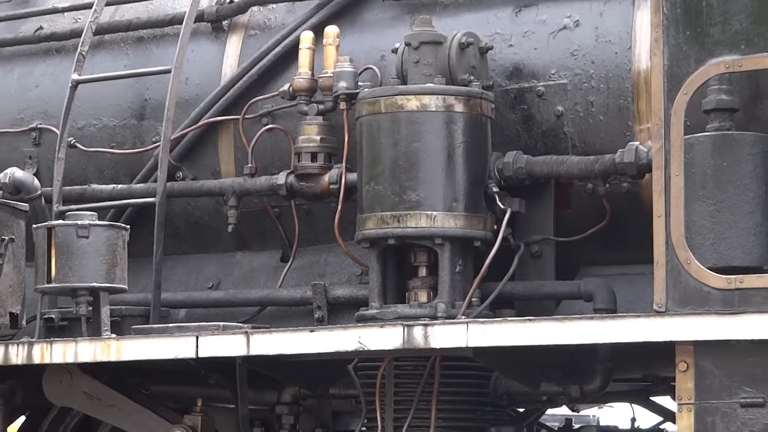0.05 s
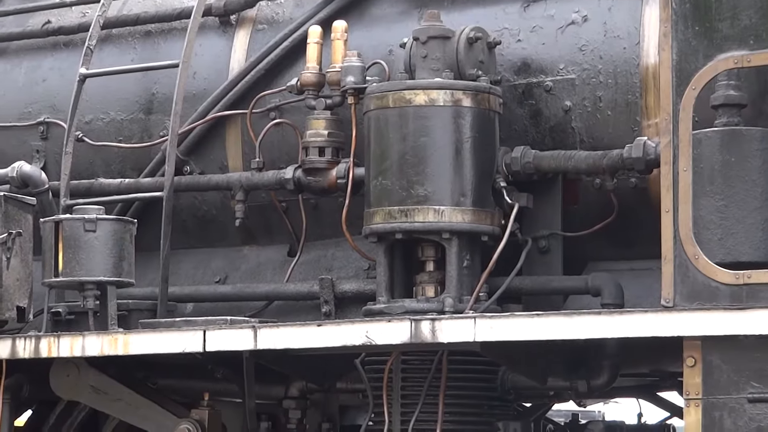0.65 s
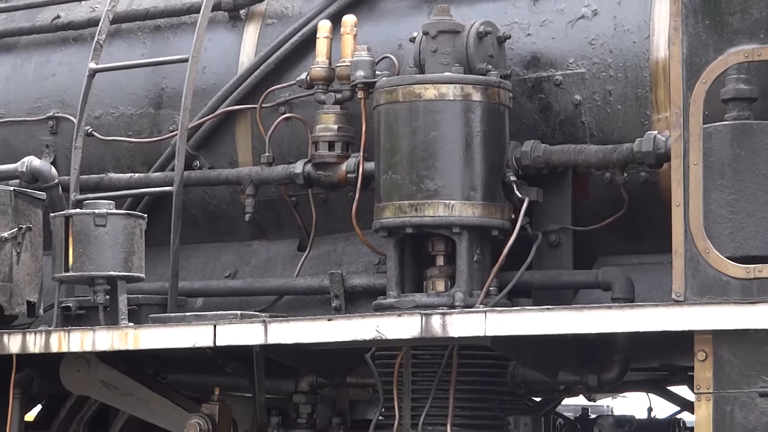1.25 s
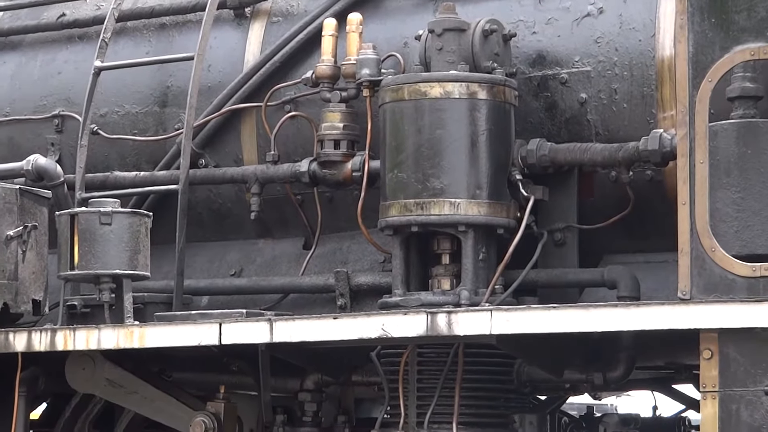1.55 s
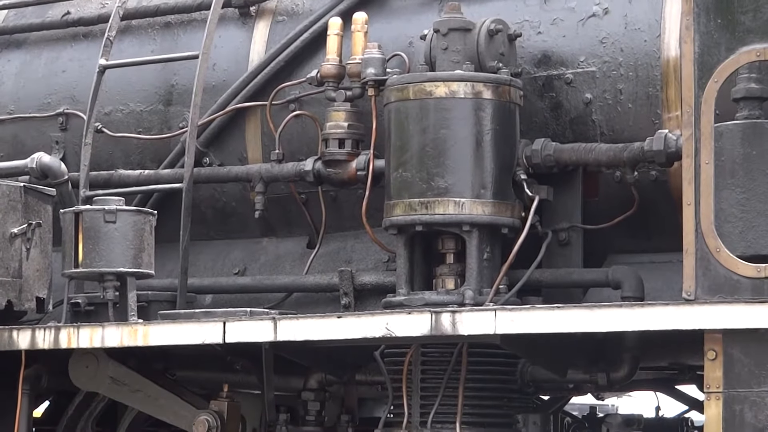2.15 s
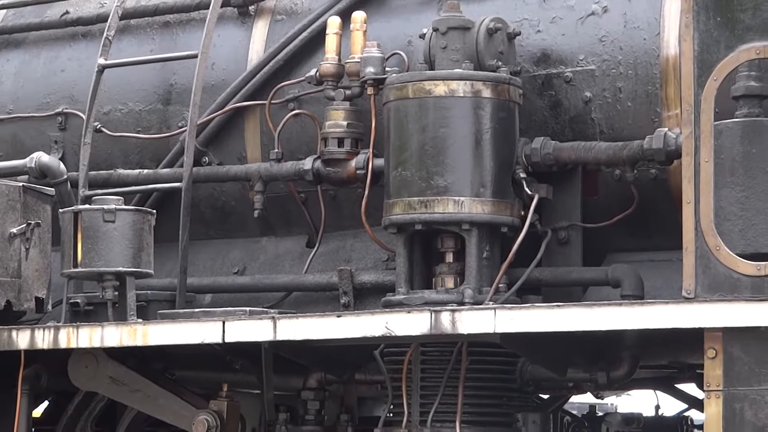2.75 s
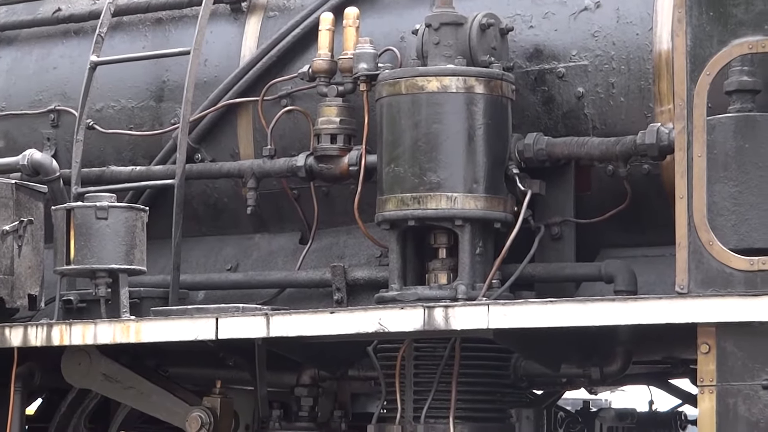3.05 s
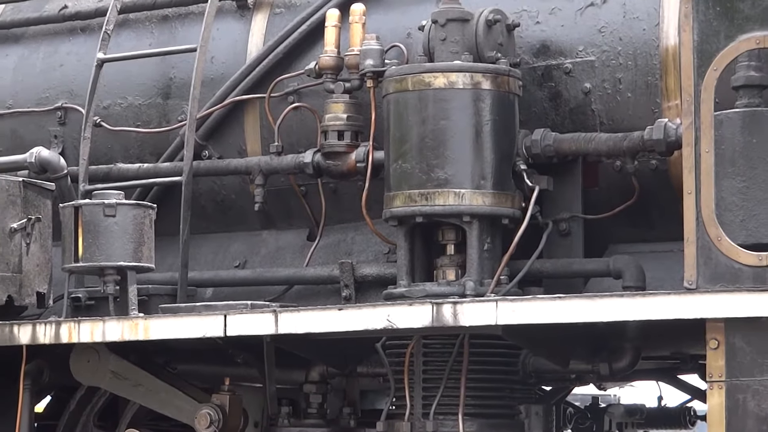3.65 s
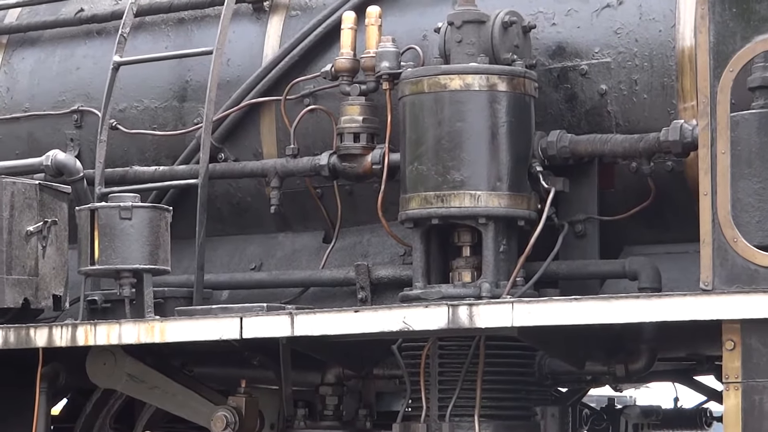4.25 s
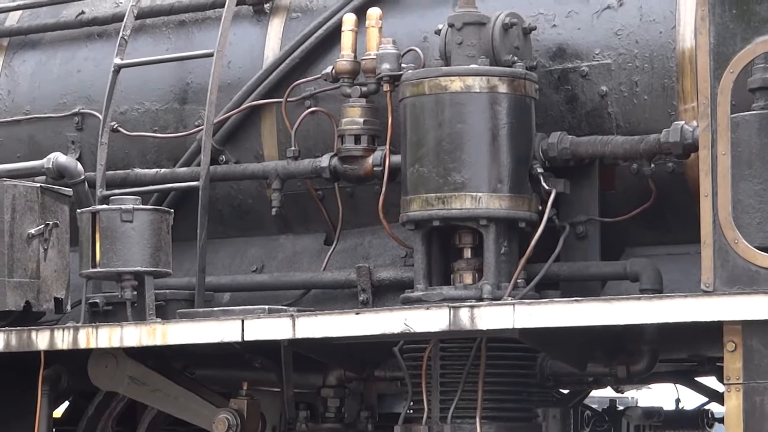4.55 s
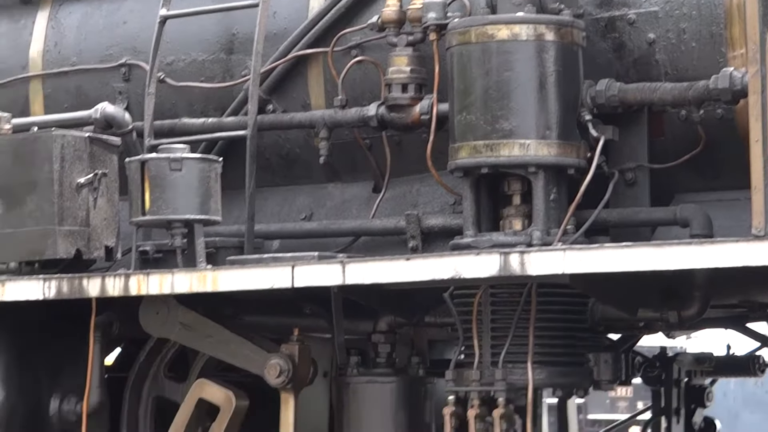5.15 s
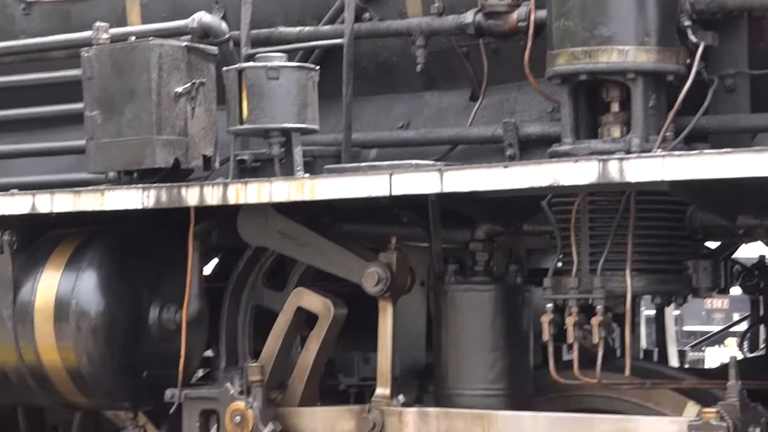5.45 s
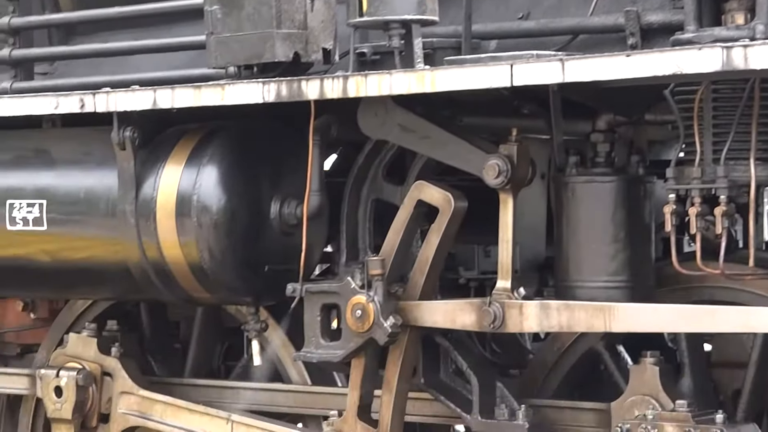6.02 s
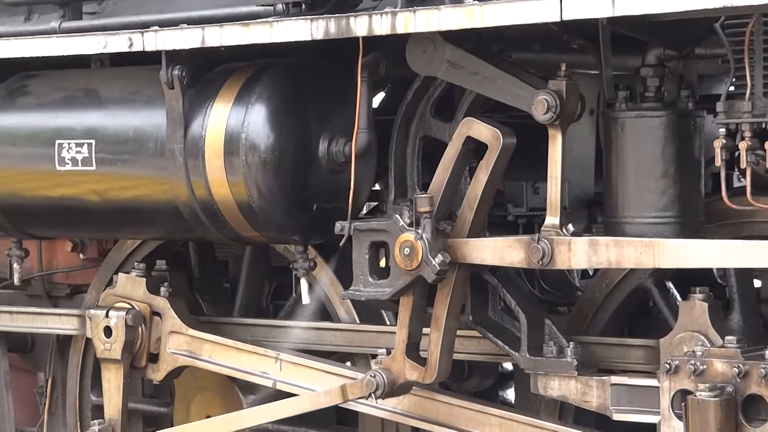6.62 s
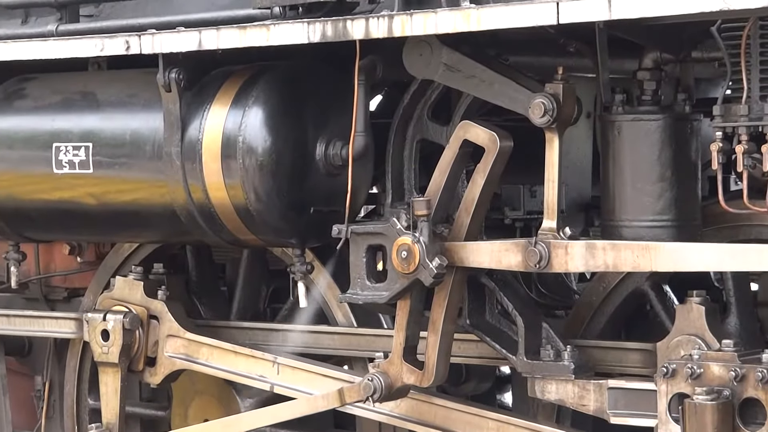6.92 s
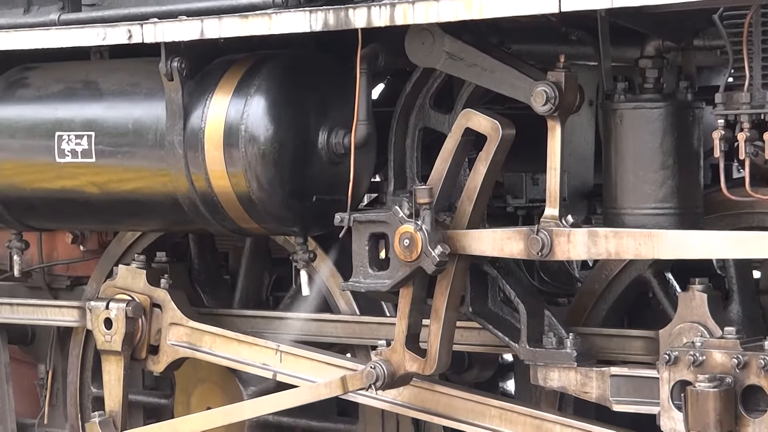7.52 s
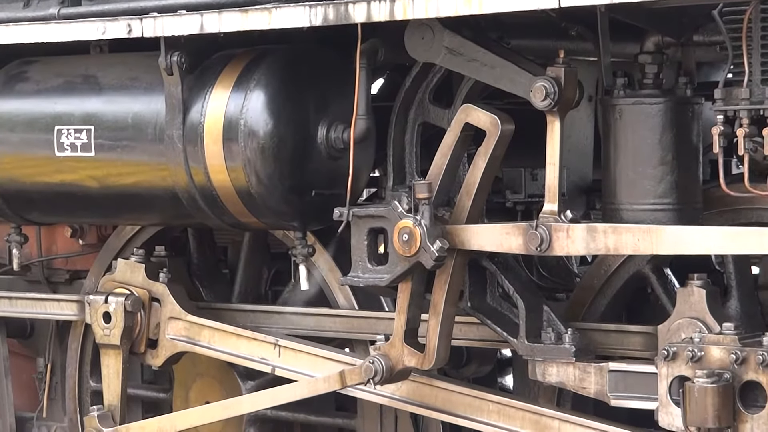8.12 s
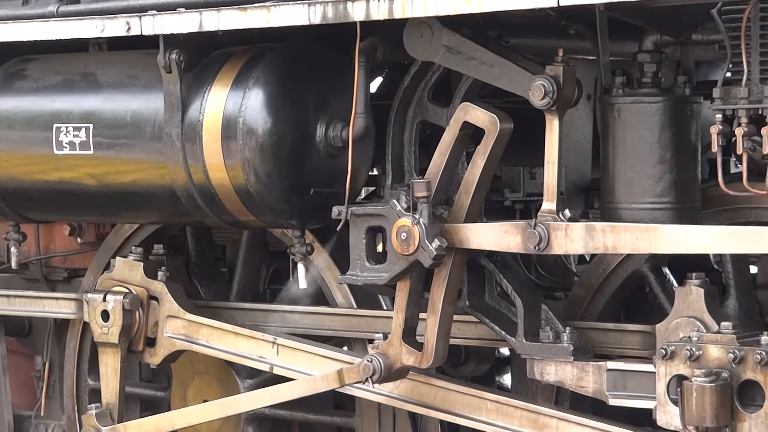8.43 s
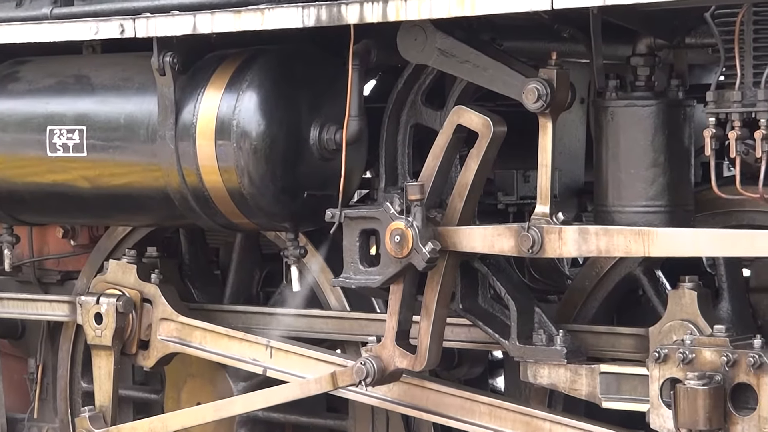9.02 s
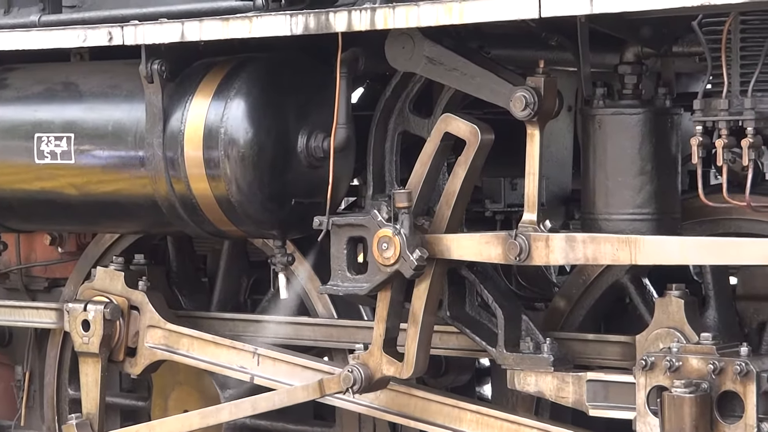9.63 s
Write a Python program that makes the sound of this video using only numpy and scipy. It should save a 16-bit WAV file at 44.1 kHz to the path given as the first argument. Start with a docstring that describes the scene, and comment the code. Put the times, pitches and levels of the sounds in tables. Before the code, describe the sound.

From the start, the air pump of a standing steam locomotive chuffs outdoors at about three strokes a second, slowing almost imperceptibly over ten seconds. Each stroke is a bright, hissing blast of steam that opens with a sharp spit and tiny high chirps, then sags into a thin, fitful, slightly falling whistle. Every other stroke begins with a dull, dry knock from the piston. Underneath, a hollow murmur swells in the pipes with each stroke and a soft leak simmers steadily. Faint, short, hollow hoots surface in the murmur near 1, 1.6, 3.6 and 4.3 seconds. Between about 4.5 and 7 seconds the microphone tips toward the wheels and the knocks soften, while the hissing stays just as strong. The whistle and murmur weaken around 7 seconds and recover by about 8.5. The pumping continues to the end.

```python
"""Steam locomotive air pump

The pump of a standing engine works up and down outdoors, three strokes a second, slowly lengthening.
Each stroke lets out a blast of steam that spits, chirps, then sags and whistles as the piston slows.
The pump knocks at one end of its travel; the pipes murmur and a leak simmers underneath.
Halfway through, the microphone tips down toward the wheels and the knocks soften."""
import sys
import numpy as np
from scipy import signal
from scipy.fft import rfft, irfft, next_fast_len
from scipy.io import wavfile
from scipy.ndimage import uniform_filter1d

SR = 44100
rng = np.random.default_rng(int(sys.argv[2]) if len(sys.argv) > 2 else 0)


def file_out(sig):
    """Save sig as 16-bit WAV at sys.argv[1]."""
    # one column per channel
    cols = np.atleast_2d(sig).T
    # limit, then scale
    lim = np.clip(cols, -1, 1)
    pcm = np.round(lim * 32767).astype(np.int16)
    wavfile.write(sys.argv[1], SR, pcm)


N = 431298
TIME = np.arange(N) / SR
FREQS = np.fft.rfftfreq(N, 1 / SR)


def gain_of(db):
    """Decibels to gain."""
    return 10 ** (np.asarray(db) / 20)


def unit_rms(x):
    """Scales to rms 1."""
    return x / np.sqrt(np.mean(x ** 2) + 1e-20)


def add(mix, start_s, sound):
    """Lays a sound into the mix."""
    part = mix[max(round(start_s * SR), 0):][:len(sound)]
    part += sound[:len(part)]


def colour(points, peaks=()):
    """An EQ curve as gains: an outline of (freq_hz, level_db) plus bell-shaped resonances."""
    hz, db = np.transpose(points)
    outline_db = np.interp(np.log(FREQS + 1), np.log(hz), db)
    bells_db = sum(boost * np.exp(-((FREQS - f) / (width / 2)) ** 2 / 2) for f, width, boost in peaks)
    return gain_of(outline_db + bells_db)


def noise(eq):
    """Noise shaped by an EQ curve, then scaled to rms 1."""
    size = next_fast_len(N, real=True)
    eq = np.interp(np.fft.rfftfreq(size, 1 / SR), FREQS, eq)
    spectrum = rng.standard_normal(len(eq)) + 1j * rng.standard_normal(len(eq))
    return unit_rms(irfft(eq * spectrum, size)[:N])


def flutter(rate_hz, slowest_hz=4):
    """Random unsteadiness of rms 1, weaker toward its top rate."""
    return noise((FREQS > slowest_hz) / (FREQS + 2) ** 0.47 / (1 + (FREQS / rate_hz) ** 2))


def tone(hz, wobble_hz):
    """A sine of rms 1 whose pitch is shaken by the flow."""
    return np.sqrt(2) * np.sin(2 * np.pi * np.cumsum(hz + wobble_hz * flutter(160)) / SR)


def low_cut(x, cutoff_hz):
    """Thins the bass, which small sources barely radiate."""
    return signal.sosfilt(signal.butter(3, cutoff_hz, "highpass", fs=SR, output="sos"), x)


def mic_tilt(time_s, from_s=4.6, to_s=6.8):
    """The microphone's aim: 0 facing the pump, 1 down toward the wheels."""
    return np.interp(time_s, [from_s, to_s], [0, 1])


def strokes(first_back_s=.0531, cycle_s=.66395, longer_s_per_cycle=.001452, back_share=.5047):
    """Each stroke's start and direction (1 = back, 0 = out); the beat drags as air pressure builds."""
    cycle, going_out = np.divmod(np.arange(-1, 2 * int(N / SR / cycle_s + 2)), 2)
    turns = cycle + back_share * going_out
    return first_back_s + cycle_s * turns + longer_s_per_cycle * turns ** 2 / 2, 1 - going_out


# The pump's vigour wanes, rallies and wanes again: time_s, level_db
PUMP_VIGOUR = [(0, -0.5), (3.6, 1), (4.4, -1.5), (6.4, -3.5), (7.3, -9.5), (8.6, 1), (9.5, -6.5)]
# How closely a layer rides the vigour: layer, db_per_db
VIGOUR_FOLLOW = {"whistle": 0.7, "roar": 0.12, "murmur": 0.28}
# Trims with the microphone fully down: layer, change_db
TILT_TRIM_DB = {"hiss": -0.3, "roar": 0.17, "murmur": -1, "sag": 1.7, "knock": -4}
# Chance from stroke to stroke: layer, deviation_db
STROKE_JITTER_DB = {"hiss": 0.44, "roar": 0.6, "murmur": 1.43, "sag": .5, "whistle": 1.3, "knock": 1}


def stroke_db(layer, start_s):
    """A layer's trim for each stroke, from vigour, microphone aim and a little chance."""
    vigour_db = VIGOUR_FOLLOW.get(layer, 0) * np.interp(start_s, *np.transpose(PUMP_VIGOUR))
    tilt_db = TILT_TRIM_DB.get(layer, 0) * mic_tilt(start_s)
    return vigour_db + tilt_db + STROKE_JITTER_DB[layer] * rng.standard_normal(len(start_s))


def pump_motion(slowing_s=0.11, lead_s=0.027, curve=2.2):
    """Control signals: seconds into the stroke, direction, sag of the flow and each layer's trim."""
    start_s, back = strokes()
    stroke = np.searchsorted(start_s, TIME, "right") - 1
    trim_db = {layer: stroke_db(layer, start_s)[stroke] for layer in ("hiss", "roar", "murmur")}
    sag_depth = np.where(back, 7.5, 10.5) + stroke_db("sag", start_s)
    trim_db["whistle"] = stroke_db("whistle", start_s)[stroke]
    remaining_s = start_s[stroke + 1] - TIME
    # the air being compressed brakes the piston toward the end of its travel
    braking = np.maximum(1 + (lead_s - remaining_s) / slowing_s, 0) ** curve
    return TIME - start_s[stroke], back[stroke], sag_depth[stroke] * braking, trim_db


def envelope_db(table, age_s, back):
    """Retriggers a level envelope on every stroke, with one shape for each direction."""
    time_s, out_db, back_db = np.transpose(table)
    return np.where(back, np.interp(age_s, time_s, back_db), np.interp(age_s, time_s, out_db))


# Tone of the leak: freq_hz, level_db
LEAK_EQ = [(40, -44), (200, -22), (700, 1.5), (1600, -4), (3500, 3), (6000, 6), (9000, 3), (12000, -25),
           (15800, -29)]


def leak(level_db=-31):
    """Escaping steam lays a steady, simmering bed."""
    return noise(colour(LEAK_EQ)) * gain_of(level_db + .5 * flutter(30))


# Tone of steam in the pipes: freq_hz, level_db
PIPE_EQ = [(25, -34), (60, -30), (110, -22.5), (170, -20), (300, -10), (520, -2.5), (900, 2), (1400, 2.5),
           (2500, 2), (6000, -16)]
# Pipe resonances: freq_hz, width_hz, boost_db
PIPE_RESONANCES = [(182, 36, 3.5), (224, 20, 4), (276, 24, 4), (380, 24, 4.5), (410, 30, -3.5),
                   (440, 26, 2), (507, 45, 5.5), (656, 45, 3), (712, 36, 2.5), (772, 40, 3),
                   (828, 50, -5.5), (915, 55, 3.5), (1080, 70, 2.5), (1180, 60, -4.5), (1262, 40, 2)]
# The murmur's swell through a stroke: age_s, out_db, back_db
MURMUR_SWELL = [(0, 4.5, 6.5), (.05, -1, 6.5), (.1, -1.5, 5.5), (.16, 2, 7), (.24, 3, 8), (.3, 2.5, 8),
                (.345, -6.5, 2)]


def pipe_murmur(age_s, back, trim_db, level_db=-32.5):
    """Steam murmurs in the resonant pipes, swelling through each stroke."""
    direction_db = np.where(back, -0.58, 3.5)
    swell_db = uniform_filter1d(envelope_db(MURMUR_SWELL, age_s, back) + direction_db + trim_db, 900)
    return noise(colour(PIPE_EQ, PIPE_RESONANCES)) * gain_of(level_db + swell_db + 0.65 * flutter(40))


# Soft hoots: start_s, length_s, pitch_hz, level_db
HOOT_NOTES = [(0.898, 0.19, 892, -31), (1.601, 0.18, 760, -31.5), (3.617, 0.12, 655, -36),
              (4.307, 0.15, 650, -35)]


def hoots():
    """Faint hollow notes come and go in the murmur."""
    out = np.zeros(N)
    for start_s, length_s, pitch_hz, level_db in HOOT_NOTES:
        size = int(length_s * SR)
        add(out, start_s, tone(pitch_hz, wobble_hz=22)[:size] * np.hanning(size) * gain_of(level_db))
    return out


# Ring of the pump body: pitch_hz, level_db, t60_s
BODY_MODES = [(101, -9, 0.1), (171.5, -8, 0.094), (236, -13.5, 0.036), (281, -5.5, 0.056),
              (374.5, -12, 0.13), (448, -2.5, 0.05), (500, -2.5, 0.049), (675, -6, 0.05),
              (764, -6.5, 0.046)]
# The blows of one knock, around the start of a back stroke: offset_s, level_db, centre_hz
KNOCK_BLOWS = [(-.018, 0, 445), (-.0108, 2, 620), (.007, 3.5, 390), (.022, -5, 195)]


def knocks(level_db=-18, jitter_db=0.5, jitter_s=0.00032, rise_cycles=1.4, reach_octaves=0.9):
    """Piston and valve gear hit their stops in a quick cluster of dull blows."""
    out, t = np.zeros(N), np.arange(SR // 6) / SR
    modes = []
    for hz, db, t60_s in BODY_MODES:
        attack = 1 - np.exp(-(hz * t / rise_cycles) ** 2)  # deep modes bloom last
        modes.append(attack * gain_of(db - 60 * t / t60_s) * np.sin(2 * np.pi * hz * t))
    mode_hz = np.transpose(BODY_MODES)[0]
    start_s, back = strokes()
    hits_s = start_s[back == 1]
    for hit_s, trim_db in zip(hits_s, stroke_db("knock", hits_s)):
        for offset_s, blow_db, centre_hz in KNOCK_BLOWS:
            late, harder = rng.standard_normal(2)
            excitation = np.exp(-(np.log2(mode_hz / centre_hz) / reach_octaves) ** 2 / 2)
            force = gain_of(level_db + trim_db + blow_db + jitter_db * harder)
            add(out, hit_s + offset_s + jitter_s * late, force * (excitation @ modes))
    return low_cut(out, cutoff_hz=65)


# Chirps of the gathering flow: settled_hz, sharp_by_hz, peak_s, half_length_s, out_db, back_db
CHIRPS = [(5290, 800, .085, .035, -29, -36), (9020, 650, .06, .05, -28.5, -30.5),
          (9010, 0, .16, .06, -33, -33), (9680, 500, .055, .025, -36, -30),
          (10520, 500, .08, .03, -34, -40)]


def edge_tones(age_s, back, whistle_trim_db, level_db=0.2, settle_s=.028, fitful_db=3.5, follow=0.4):
    """Thin chirps, most starting sharp and settling as the piston gathers speed."""
    out = np.zeros(N)
    for settled_hz, sharp_by_hz, peak_s, half_length_s, out_db, back_db in CHIRPS:
        chirp_db = level_db + follow * whistle_trim_db + np.where(back, back_db, out_db)
        flicker_db = fitful_db * np.tanh(flutter(60))
        pitch_hz = settled_hz + sharp_by_hz * np.exp(-age_s / settle_s)
        swell = np.exp(-((age_s - peak_s) / half_length_s) ** 2)
        out += tone(pitch_hz, wobble_hz=38) * swell * gain_of(chirp_db + flicker_db)
    return out


def whistle(sag_db, trim_db, level_db=-30, pitch_hz=4845, droop_hz_per_db=10, fitful_db=5):
    """A fitful whistle sings as the blast sags, falling in pitch with the flow."""
    onset = np.clip(sag_db / 2 - .4, 0, 1)
    fade = gain_of(-.6 * np.maximum(sag_db - 5, 0))
    note = tone(pitch_hz - droop_hz_per_db * sag_db, wobble_hz=22)
    flicker_db = fitful_db * np.tanh(flutter(120, slowest_hz=15))
    return note * uniform_filter1d(onset * fade, 150) * gain_of(level_db + trim_db + flicker_db)


def spit(age_s, ring_db=-24, ring_s=0.012, crack_db=-23, crack_s=0.021):
    """The first gulp of steam cracks at the nozzle and rings the exhaust pipe."""
    ring_eq = colour([(300, -70), (1500, -27), (2300, -13), (2700, 7), (3200, 2),
                      (4500, -26), (9000, -17)])
    crack_eq = colour([(300, -70), (4000, -37), (10500, 10), (15800, -12)])
    ring = noise(ring_eq) * gain_of(ring_db) * np.exp(-age_s / ring_s)
    crack = noise(crack_eq) * gain_of(crack_db) * np.exp(-age_s / crack_s)
    return ring + crack


# The valve spits, falters and opens: age_s, out_db, back_db
VALVE_OPENING = [(0, -10, -18), (.002, -4, -7.5), (.007, -0.5, -11), (.012, -3.5, -5), (.02, -2.5, -3),
                 (.032, -1, -1)]


def valve_flow_db(age_s, back, sag_db):
    """The steam flow rises as the valve opens and sags as the piston slows."""
    return envelope_db(VALVE_OPENING, age_s, back) - sag_db


def sizzle(flow_db, level_db=-35, follow=1.8):
    """The finest spray at the nozzle adds a bright top only near full flow."""
    spray = noise(colour([(6000, -40), (11000, -4), (12300, 6), (13400, -5), (15500, -3)]))
    return spray * gain_of(level_db + follow * flow_db + .9 * flutter(200))


def turbulence(x, depth_db=0.9, width_hz=350, length_s=0.2):
    """Turbulence shifts the jet's colour in drifting patches."""
    hz, t, spectrogram = signal.stft(x, SR, nperseg=512)
    patches = rng.standard_normal(spectrogram.shape)
    for _ in range(2):
        patches = uniform_filter1d(patches, max(round(width_hz / hz[1]), 1), axis=0)
        patches = uniform_filter1d(patches, max(round(length_s / t[1]), 1), axis=1)
    return signal.istft(spectrogram * gain_of(depth_db * unit_rms(patches)), SR)[1][:N]


# Tone of the jet at full flow: freq_hz, level_db
JET_EQ = [(100, -70), (900, -13), (1300, -9.5), (1600, -4.5), (2250, -5), (3100, -4), (4200, -3),
          (5000, -4), (6100, -3), (8800, 3), (10200, 2), (11600, -3), (12600, -8.5), (15800, -20.5)]
# Jet resonances: freq_hz, width_hz, boost_db
JET_RESONANCES = [(1445, 70, 5), (1605, 70, 2.5), (2260, 120, -1.5), (2550, 280, 4), (4280, 200, 1),
                  (4640, 240, -1.5), (5400, 400, 1), (5980, 180, -1.2), (7480, 300, 2), (11400, 400, 2)]


def blast(flow_db, trim_db, hiss_db=-17, roar_db=-20, split_hz=5000, hiss_follow=0.94, roar_follow=0.71):
    """The exhaust jet: its hiss dies faster than its roar as the flow sags."""
    eq = colour(JET_EQ, JET_RESONANCES)
    treble_share = 1 / (1 + (split_hz / (FREQS + 1)) ** 8)
    rough_db = flow_db + 0.51 * flutter(260)
    hiss = noise(eq * np.sqrt(treble_share))
    hiss *= gain_of(hiss_db + trim_db["hiss"] + hiss_follow * rough_db)
    roar = noise(eq * np.sqrt(1 - treble_share))
    roar *= gain_of(roar_db + trim_db["roar"] + roar_follow * rough_db + 0.76 * flutter(120))
    return turbulence(hiss + roar)


# Tone of the side channel: freq_hz, level_db
SIDE_EQ = [(50, -22), (120, -45), (300, -25), (800, -16.5), (2200, -19), (4200, -24), (6000, -25),
           (8700, -47.5), (9200, -15), (10800, -14.5), (12000, -56)]


def spread(mid, t60_s=0.4):
    """A faint, filtered diffuse tail gives a little stereo width."""
    t = np.arange(SR // 5) / SR
    tail = rng.standard_normal(len(t)) * gain_of(-60 * t / t60_s) * (t > .001)
    side = signal.oaconvolve(mid, tail / np.linalg.norm(tail))[:N]
    side = irfft(rfft(side) * colour(SIDE_EQ), N)
    pan_db = np.interp(mic_tilt(TIME), [0, 1], [-.42, -.9])  # left minus right
    return np.array([(mid + side) * gain_of(pan_db / 2), (mid - side) * gain_of(-pan_db / 2)])


def scene():
    """The piston drives exhaust and murmur over the leak; the knocks sit dry in the centre."""
    age_s, back, sag_db, trim_db = pump_motion()
    flow_db = valve_flow_db(age_s, back, sag_db)
    steam = blast(flow_db, trim_db) + sizzle(flow_db) + spit(age_s)
    tones = whistle(sag_db, trim_db["whistle"]) + edge_tones(age_s, back, trim_db["whistle"]) + hoots()
    exhaust = low_cut(steam + tones, cutoff_hz=400)
    bed = pipe_murmur(age_s, back, trim_db["murmur"]) + leak()
    return spread(exhaust + bed) + knocks()


def record(dry, cutoff_hz=15850):
    """A steep high cut takes off the very top."""
    high_cut = signal.firwin(801, cutoff_hz, window=("kaiser", 9), fs=SR)
    return signal.oaconvolve(dry, high_cut[None], "same")


dry = scene()
out = record(dry)
file_out(out)
```